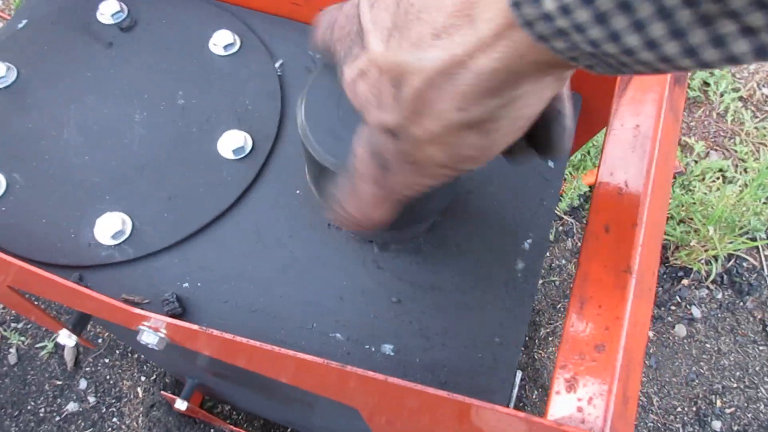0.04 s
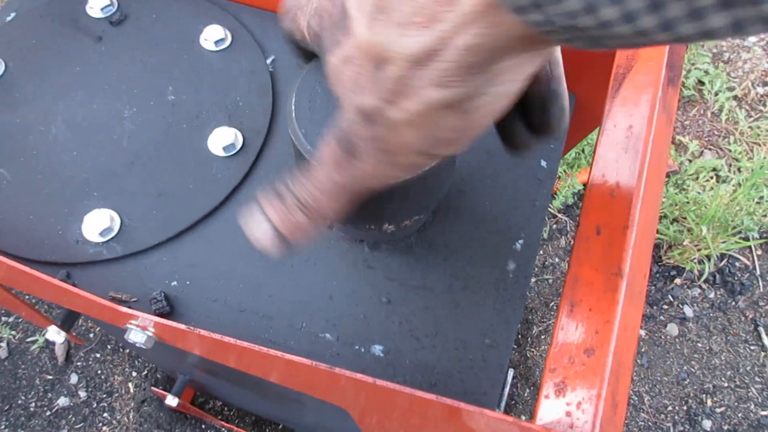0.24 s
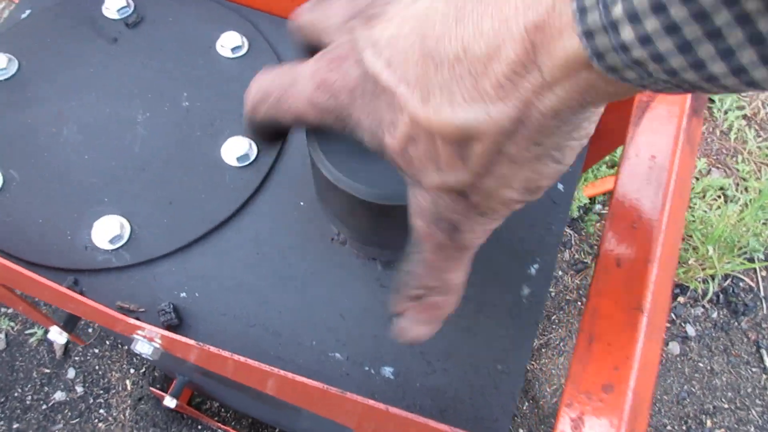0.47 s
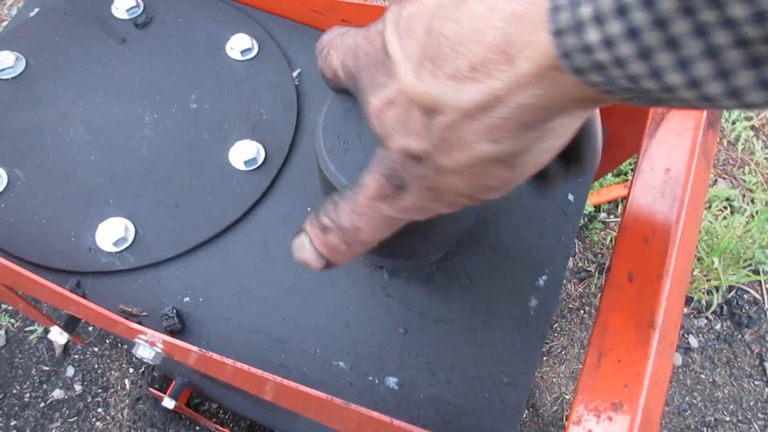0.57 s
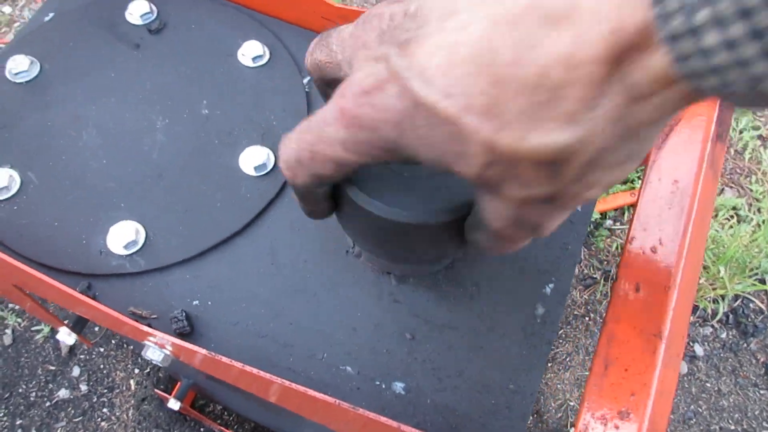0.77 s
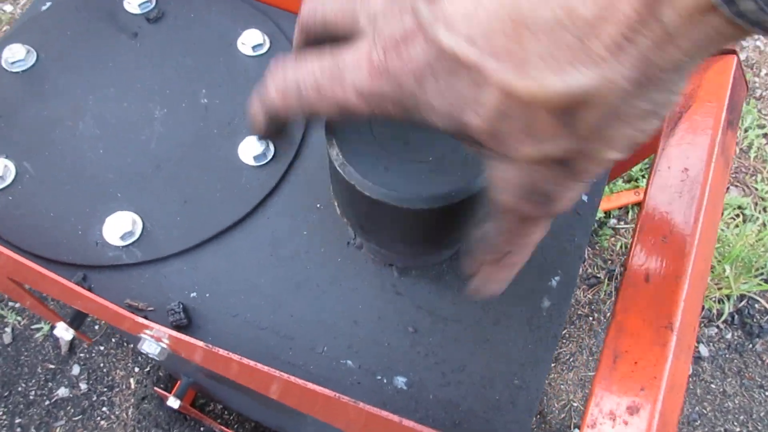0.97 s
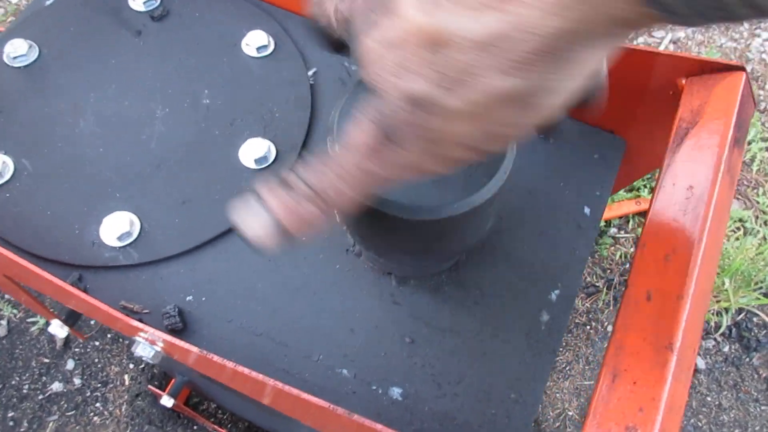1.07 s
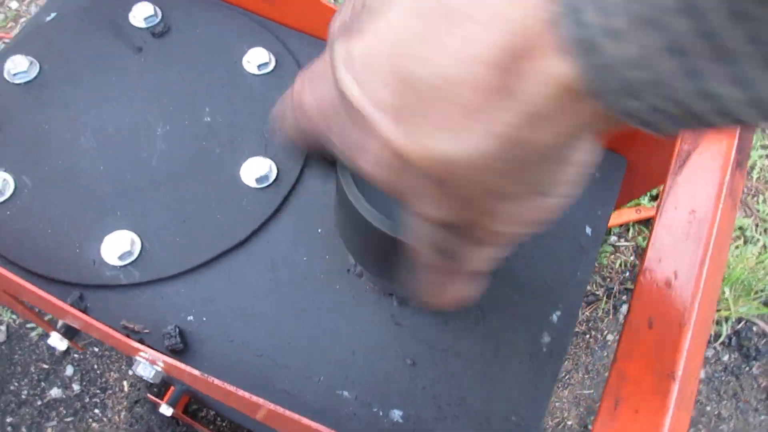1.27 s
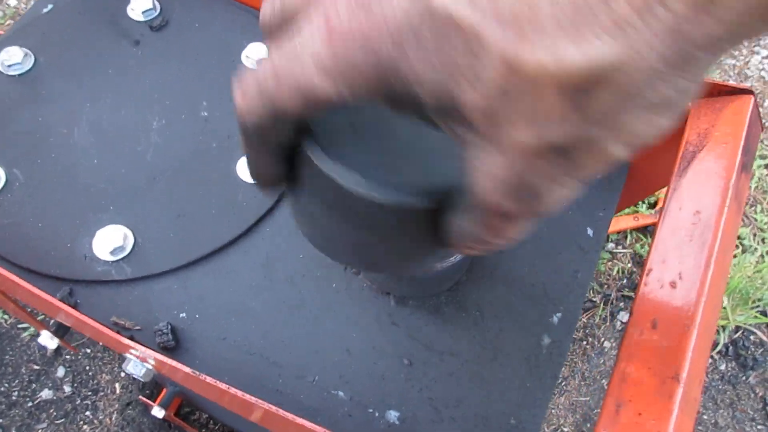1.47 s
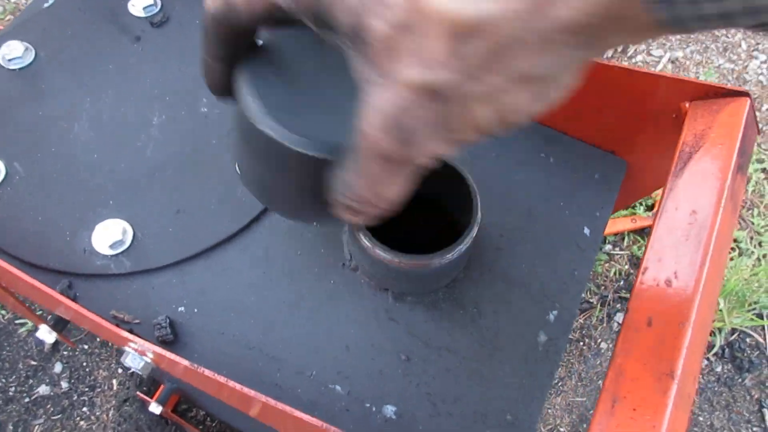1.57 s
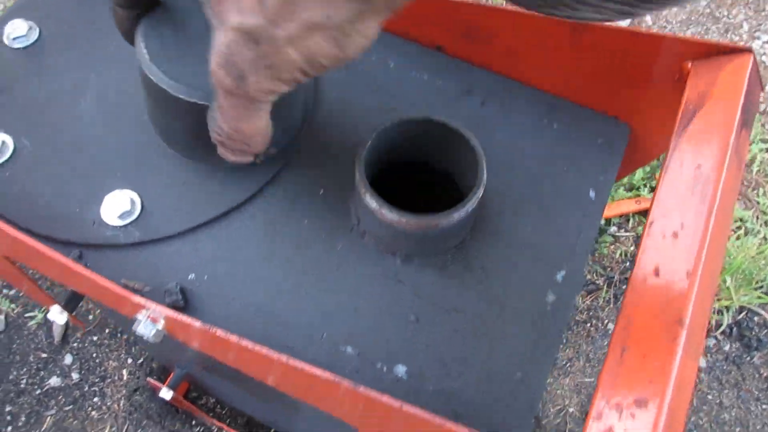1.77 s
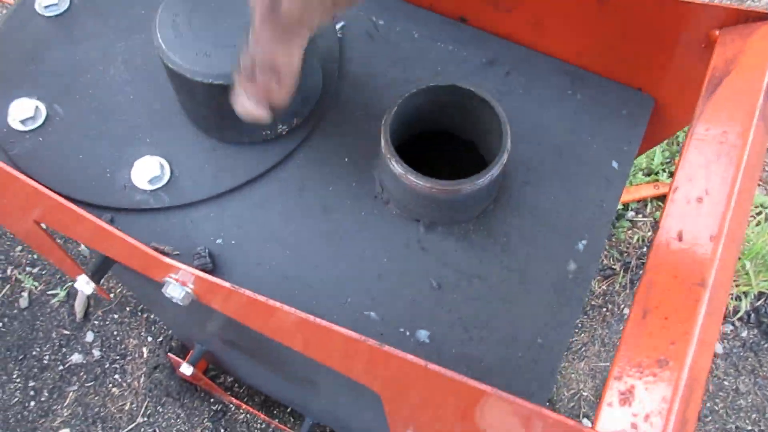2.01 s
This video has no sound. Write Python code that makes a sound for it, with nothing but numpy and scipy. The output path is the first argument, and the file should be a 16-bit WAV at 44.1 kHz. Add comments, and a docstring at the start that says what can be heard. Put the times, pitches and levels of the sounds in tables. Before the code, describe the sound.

A steel cap is worked off a pipe on a hopper, heard close and dry outdoors. A brief palm hiss starts it, then gritty thread scrapes with juddering, clacking twists at about 0.1, 0.4, 0.8-1.0 and a sharp one at 1.3 seconds. Quick hollow knocks and rim scraping follow at 1.6-1.7, then a solid, faintly ringing clunk and slide on the lid at 1.9. Faint air and distant hum underneath.

```python
"""Faint outdoor air and a far machine hum run throughout; a palm brushes the steel, loudest at the start.
A steel cap is twisted off a threaded pipe on a steel hopper, close by. In four short twists the dry
threads grind (clumps of tiny slips), judder (wavering tones with overtones) and click (small blows).
The loose cap knocks on the open pipe's mouth, then is put down on the hopper lid, ringing faintly.
Blows are a push, noise bursts and fading modes; air and palm are filtered noise, the hum is sines."""
import sys
import numpy as np
from scipy import signal
from scipy.fft import rfft, irfft
from scipy.io import wavfile
from scipy.ndimage import map_coordinates

SR = 44100
rng = np.random.default_rng(int(sys.argv[2]) if len(sys.argv) > 2 else 0)


def master_out(mix):
    """Clip the mix to full scale and print it as 16-bit PCM to the path in sys.argv[1]."""
    frames = np.transpose(np.atleast_2d(mix))
    ceiling = np.clip(frames, -1, 1)
    pcm = np.round(ceiling * 32767).astype(np.int16)
    wavfile.write(sys.argv[1], SR, pcm)


N = 90140
T = np.arange(N) / SR


def amp(db):
    """Decibels to gain."""
    return 10 ** (np.asarray(db) / 20)


def unit(x):
    """Scale x to rms 1."""
    return x / np.sqrt(np.mean(x ** 2) + 1e-20)


def wobble(rate):
    """A smooth random curve with rate random points a second."""
    return map_coordinates(rng.standard_normal(N // 8), [T * rate], mode="wrap")


def curve(t, level):
    """Straight lines between the points of a table, along the whole scene."""
    return np.interp(T, t, level)


def add(track, s, x):
    """Mix x into the track from time s on."""
    part = track[max(round(s * SR), 0):][:len(x)]
    part += x[:len(part)]


def through(x, response):
    """Filter x by an impulse response."""
    return signal.fftconvolve(x, response)[:len(x)]


BASS_HZ, TREBLE_HZ = 676, 2070  # where the bass and treble shelves turn


def colour(points, bass_db=0, treble_db=0, size=4096):
    """Impulse response of a spectrum of rms gain 1, then tilted by a bass and a treble shelf."""
    f = np.fft.rfftfreq(size, 1 / SR)
    hz, db = np.transpose(points)
    gain = unit(amp(np.interp(np.log(f + 1), np.log(hz), db)))
    bass = bass_db / (1 + (f / BASS_HZ) ** 4)
    treble = treble_db * (1 - 1 / (1 + (f / TREBLE_HZ) ** 4))
    # folding the cepstrum forward makes the response start at once (minimum phase)
    cepstrum = irfft(np.log(gain * amp(bass + treble) + 1e-6))
    cepstrum[1:size // 2] *= 2
    cepstrum[size // 2 + 1:] = 0
    return irfft(np.exp(rfft(cepstrum)))


RING_WAVER, RING_WAVER_PER_S = 0.36, 70  # phase wander [radians] of a ringing mode, and its pace


def ring(modes):
    """Metal or air ringing: each mode is a fading tone whose phase wavers slightly."""
    t = T[:SR * 3 // 4]
    out = np.zeros(len(t))
    for hz, db, t60 in modes:
        waver = RING_WAVER * np.interp(t * RING_WAVER_PER_S, np.arange(256), rng.standard_normal(256))
        out += amp(db - 60 * t / t60) * np.cos(2 * np.pi * hz * t + waver)
    return out * -np.expm1(-t * 9000)  # a very short fade-in


# A contact: the crack and the sheet steel's ring are noise, the push is a single sample.
CRACK_T60_S, CRACK_DB, SHELL_T60_S, SHELL_DB, PUSH_DB = 0.01, -5, 0.08, -9.5, 14.5


def blow(response, crack_t60, push_db):
    """One contact: a push, a short chattering crack and the dense ring of the sheet steel."""
    t = T[:SR * 3 // 4]
    crack, shell = rng.standard_normal((2, len(t)))
    force = crack * amp(CRACK_DB - 60 * t / crack_t60)
    force += shell * amp(SHELL_DB - 60 * t / SHELL_T60_S)
    force[0] -= amp(push_db)
    return through(force, response)


GRAINS_PER_S, GRAIN_SPREAD_DB, CLUMP_DB = 3000, 2, 3


def friction(strokes, spectrum, modes, ring_db):
    """Rubbing: clumps of tiny random slips under each stroke drive the steel and its modes."""
    slips = (rng.random(N) < GRAINS_PER_S / SR) * rng.choice([-1, 1], N)
    slips = slips * amp(GRAIN_SPREAD_DB * rng.standard_normal(N))
    slips = unit(slips * amp(CLUMP_DB * wobble(260)))
    low = signal.sosfiltfilt(signal.butter(2, TREBLE_HZ, fs=SR, output="sos"), slips)
    high = slips - low
    force = np.zeros(N)
    for stroke in strokes:
        s, db, treble_db = np.transpose(stroke)
        level = amp(np.interp(T, s, db, left=-120, right=-120))  # all but silent outside the stroke
        force += level * (low + amp(curve(s, treble_db)) * high)
    tone = ring(modes)
    tone = tone / np.linalg.norm(tone)
    return through(force, colour(spectrum)) + amp(ring_db) * through(force, tone)


# The many weak upper modes of the cap: where they lie and how long they last
FINE_LOW_HZ, FINE_TOP_HZ, FINE_T60_S = 3330, 14880, 0.043
SEATED_FINE_DB, LOOSE_FINE_DB = -16, -9  # their strength with the cap seated, and loose
RADIATE_HZ = 268  # the steel radiates little below this


def steel(x, fine_db, count=70):
    """The cap's upper modes ring along with every contact; the deep bass does not radiate."""
    t = T[:SR // 3]
    place, size = rng.random((count, 2)).T
    hz = FINE_LOW_HZ + (FINE_TOP_HZ - FINE_LOW_HZ) * (np.arange(count) + place) / count
    tones = (size - .5)[:, None] * np.sin(2 * np.pi * hz[:, None] * t)
    fine = tones.sum(0) * amp(-60 * t / FINE_T60_S)
    upper = through(x, fine / np.linalg.norm(fine))
    high_pass = signal.butter(3, RADIATE_HZ, "high", fs=SR, output="sos")
    return signal.sosfilt(high_pass, x + amp(fine_db) * upper)


# Colour of the outdoor air: f/Hz, level/dB
AIR_COLOUR = [(20, -26), (65, -4), (120, -10), (200, -10), (290, -2.5), (420, -22), (620, -17.5),
              (1000, -20), (2000, -22.5), (7000, -44), (15000, -44.5)]
AIR_DB = -51.5


def outdoor_air():
    """Outdoor air is steady noise, filtered to its colour."""
    return amp(AIR_DB) * through(rng.standard_normal(N), colour(AIR_COLOUR))


# Tones of the distant machine, before their swell: f/Hz, level/dB
HUM_TONES = [(53.3, -64), (70.7, -56.5), (99.5, -65.5), (289, -70.5), (568, -62)]
# Swell of all these tones together: t/s, level/dB
HUM_SWELL_CURVE = [(0, 2.5), (.36, 11), (.46, -1.5), (1.22, 5.5), (1.4, -2.5), (2.04, -1)]


def distant_machine():
    """A far hum: a few sines, slightly unsteady in level and phase, swelling together."""
    swell_db = curve(*np.transpose(HUM_SWELL_CURVE))
    hum = np.zeros(N)
    for hz, db in HUM_TONES:
        level = amp(db + swell_db + 0.5 * wobble(15)) * np.sqrt(2)  # the table gives rms levels
        hum += level * np.sin(2 * np.pi * hz * T + 0.13 * wobble(14))
    return hum


# Loudness of the palm sliding on the cap: t/s, level/dB
PALM_LEVEL = [(0, -45.5), (.04, -42.5), (.1, -52), (.3, -69), (.345, -60.5), (.66, -67), (1.0, -55.5),
              (1.06, -77), (1.19, -61), (1.5, -89), (1.55, -70.5), (2.04, -73)]
# Colour of skin on steel: f/Hz, level/dB
SKIN_COLOUR = [(300, -2), (2000, -7), (2900, -15.5), (4100, 2), (5000, -13.5), (7000, -6.5), (8400, -5.5),
               (9500, -10.5), (11300, -18), (13500, -12.5), (15500, -28)]


def palm():
    """Dry skin hisses over the steel as the grip shifts: noise that follows a level curve."""
    level_db = curve(*np.transpose(PALM_LEVEL)) + 0.66 * wobble(31)
    return amp(level_db) * through(rng.standard_normal(N), colour(SKIN_COLOUR))


# Modes of the free cap, some in close pairs that beat: f/Hz, level/dB, t60/s
CAP_MODES = [(569, -29, .4), (1125, -32, .22), (2503, -38, .55), (2541, -44, .5), (3348, -32, .17),
             (3397, -30, .1), (3650, -28, .11), (4480, -29, .1), (5093, -30, .1), (5873, -48, .36),
             (5975, -33, .15)]
# The cap landing on the hopper lid and rocking: t/s, level/dB, bass/dB, treble/dB
LANDING_BLOWS = [(1.8812, 0, 0.5, -3), (1.8815, -4, -4.5, -10), (1.8944, -13, 9.5, -8),
                 (1.9075, -27, -5, 15), (1.9147, -19.5, 13, 18), (1.9295, -21.5, -20, 10.5)]
# The cap's rim sliding on the lid: t/s, level/dB, treble/dB
LID_SLIDE = [(1.881, -30, 4), (1.89, -24.5, 1), (1.906, -29.5, 9.5), (1.918, -16.5, 6), (1.934, -24.5, -4),
             (1.952, -37, 11), (1.98, -50, 2), (2.03, -58.5, 0), (2.043, -36, -14)]
# Colour of the lid under the cap: f/Hz, level/dB
LID_COLOUR = [(60, -8), (230, -15), (350, -12.5), (470, 1), (700, 2.5), (1000, 0.5), (1350, 1), (1600, -9),
              (2400, -9), (3700, -24.5), (4500, -28), (6000, -29.5), (8500, -34), (10500, -35.5),
              (13000, -49), (15000, -62)]
SLIDE_RING_DB, LANDING_RING_DB = -17.5, -15


def landing():
    """The cap is put down on the lid, rocks and slides a little, ringing as it does."""
    out = friction([LID_SLIDE], LID_COLOUR, CAP_MODES, SLIDE_RING_DB)
    for s, db, bass_db, treble_db in LANDING_BLOWS:
        contact = blow(colour(LID_COLOUR, bass_db, treble_db), CRACK_T60_S, PUSH_DB)
        add(out, s, amp(db) * (contact + amp(LANDING_RING_DB) * ring(CAP_MODES)))
    return out


# The freed cap hitting the pipe's mouth: t/s, level/dB, bass/dB, treble/dB, pipe ring level/dB
MOUTH_BLOWS = [(1.6142, -12.5, -13, 1, -10.5), (1.6415, -14, 8.5, -14, -12), (1.6715, -10.5, -1, -3, -10.5),
               (1.6858, -14, -6, 5.5, -9)]
# The cap's rim dragging over the last thread: t/s, level/dB, treble/dB
RIM_DRAG = [(1.614, -19.5, 2.5), (1.638, -45, 12), (1.648, -29.5, 12), (1.667, -40, 0), (1.678, -27, 11.5),
            (1.703, -29, 11.5), (1.72, -29.5, 4), (1.745, -45, -7), (1.79, -56, -4)]
# Colour of the steel with the cap loose: f/Hz, level/dB
LOOSE_COLOUR = [(60, -41), (220, -23), (340, -14), (470, -5.5), (700, 8), (1000, -3), (1400, -7.5),
                (1900, -8), (2500, -21.5), (2900, -19.5), (3550, -11.5), (4100, -33), (6000, -28.5),
                (7800, -27), (9000, -35.5), (10000, -22.5), (11700, -43), (13000, -32), (15000, -72.5)]
# Modes of the air in the open pipe: f/Hz, level/dB, t60/s
PIPE_MODES = [(455, 2, .105), (622, -10, .1), (750, -17, .15), (838, -7, .11), (1075, -11, .12),
              (1460, -20, .07), (1787, -21, .09)]
DRAG_RING_DB, KNOCK_RING_DB = -0.5, -9.5
HOLLOW_DB, HOLLOW_T60_S = -27.5, 0.84  # the hopper's hollow, heard once the pipe is open


def knocks():
    """The freed cap bumps and drags over the rim, sounding itself, the open pipe and the hollow below."""
    out = friction([RIM_DRAG], LOOSE_COLOUR, PIPE_MODES + CAP_MODES, DRAG_RING_DB)
    for s, db, bass_db, treble_db, ring_db in MOUTH_BLOWS:
        contact = amp(db) * blow(colour(LOOSE_COLOUR, bass_db, treble_db), CRACK_T60_S, PUSH_DB)
        pipe_ring = amp(ring_db) * ring(PIPE_MODES)
        add(out, s, contact + pipe_ring + amp(KNOCK_RING_DB) * ring(CAP_MODES))
    t = T[:SR // 2]
    hollow = rng.standard_normal(len(t)) * amp(-60 * t / HOLLOW_T60_S)  # fading noise as an echo
    return out + amp(HOLLOW_DB) * through(out, hollow / np.linalg.norm(hollow))


# The threads sticking and slipping: t/s, hold/s, t60/s, f/Hz, level/dB, overtone level/dB
THREAD_JUDDERS = [(0.158, 0.0074, 0.026, 925, -10.5, -24), (0.204, 0.008, 0.037, 846, -16.5, -19),
                  (.228, 0.0041, 0.02, 870, -12, -14.5), (0.233, 0.021, 0.17, 947, -16.5, -45),
                  (0.401, 0.0085, 0.054, 904.3, -4, -4), (.503, 0.034, 0.065, 852, -29, -25),
                  (.529, 0.0031, 0.054, 1003, -20.5, -35), (0.551, 0.0077, 0.07, 873, -24.5, -29),
                  (0.587, 0.014, 0.028, 915, -35.5, -30), (0.974, 0.0058, 0.022, 1026, -17, -29),
                  (1.276, 0.0088, 0.017, 790, -25, -24)]
# Overtones of a judder: multiple of its pitch, level/dB
JUDDER_OVERTONES = [(2, -9), (3, -11), (4, -7.5), (6, -20.5), (8, -26.5)]
JUDDER_RISE_S, JUDDER_WANDER, JUDDER_ROUGH_DB = 0.0017, .035, 3  # wander is a fraction of the pitch


def judders():
    """The threads stick and slip for a moment at the pitch of the cap's rocking."""
    out, t = np.zeros(N), T[:SR // 4]
    for s, hold, t60, hz, db, overtones_db in THREAD_JUDDERS:
        after_hold = np.maximum(t - hold, 0)
        slipping = amp(-60 * after_hold / 0.06)  # pitch and level steady as this dies away
        pitch = hz * (1 + JUDDER_WANDER * slipping * wobble(282)[:len(t)])
        phase = 2 * np.pi * np.cumsum(pitch) / SR
        rough_db = JUDDER_ROUGH_DB * slipping * wobble(267)[:len(t)]
        shape = np.minimum(t / JUDDER_RISE_S, 1) * amp(rough_db - 60 * after_hold / t60)
        overtones = sum(amp(level) * np.sin(round(k) * phase) for k, level in JUDDER_OVERTONES)
        add(out, s, amp(db) * shape * (np.sin(phase) + amp(overtones_db) * overtones))
    return out


# The cap rocking in its threads: t/s, level/dB, bass/dB, treble/dB
THREAD_CLICKS = [(0.114, -26, -14, -1), (0.1357, -24, 7, 5.5), (0.16, -13.5, 3.5, -19),
                 (.229, -7, -22, -11), (0.3731, -35, 16.5, -20), (0.4023, -22, -18, 9),
                 (0.4063, -13, -7, 8), (0.395, -24.5, -12, -16), (0.4203, -8.5, -15, 5.5),
                 (.491, -22, -18, -7), (0.5312, -19.5, -12, -11), (0.5484, -26.5, -20, -3.5),
                 (0.7761, -11, -10, -4.5), (0.8221, -9.5, -5, 7.5), (0.8375, -15.5, 8, 6),
                 (0.9197, -28, 13, -4), (0.945, -8.5, 6.5, -2.5), (0.9553, -15, 1.5, -9),
                 (0.9729, -14, -1, -3.5), (.9915, -24, 1, -11), (1.291, -4, 0, 7),
                 (1.2926, -7.5, 3.5, 10.5)]
# Colour of the steel with the cap seated: f/Hz, level/dB
SEATED_COLOUR = [(60, -32), (200, -13.5), (330, -11.5), (450, -5), (620, -0.5), (760, -4), (880, -6.5),
                 (1070, -2), (1230, -13.5), (1500, 1), (2050, -11.5), (2500, -8.5), (2850, -12), (3600, -6),
                 (4100, -20.5), (5000, -25), (6500, -37), (7500, -24), (9000, -39), (11800, -44.5),
                 (13500, -49.5), (15500, -56)]
# Modes of the hopper top with the cap on: f/Hz, level/dB, t60/s
HOPPER_MODES = [(571, -22, .35), (625, -8, 0.04), (853, -14, .16), (900, -14, 0.067), (1078, -13, 0.09),
                (1470, -18, 0.2), (2336, -18, 0.12), (2500, -30, 0.3), (3130, -13, 0.06), (3661, -14, 0.08),
                (5990, -36, .12)]
CHATTER_T60_S, CLICK_PUSH_DB, CLICK_RING_DB = 0.018, 12.5, -9


def clicks():
    """The cap tips in its loose threads and strikes the pipe, making the hopper top ring."""
    out = np.zeros(N)
    for s, db, bass_db, treble_db in THREAD_CLICKS:
        contact = blow(colour(SEATED_COLOUR, bass_db, treble_db), CHATTER_T60_S, CLICK_PUSH_DB)
        add(out, s, amp(db) * (contact + amp(CLICK_RING_DB) * ring(HOPPER_MODES)))
    return out


# The threads grinding, as a list of rubs: t/s, level/dB, treble/dB
GRIND_STROKES = [
    [(.1, -41, 6), (.115, -31, -3.5), (.145, -24, 2), (.175, -23, -3), (.2, -27, -6), (.23, -21.5, -13),
     (.256, -29.5, -21), (.275, -37.5, -11), (.34, -53, -17)],
    [(.365, -47.5, -33), (.395, -32, -6.5), (.425, -35.5, 13), (.458, -41.5, 7.5), (.478, -32.5, 6.5),
     (.5, -35, 2), (.55, -32.5, -4.5), (.575, -37.5, -18), (.64, -65, -19.5)],
    [(.685, -56, -15), (.712, -41.5, 1.5), (.76, -38.5, 7), (.782, -20, -3), (.805, -29, 1.5),
     (.848, -27.5, -4.5), (.872, -35.5, -6), (.912, -46, -9)],
    [(.914, -39, -8), (.942, -32, -11), (.955, -30.5, 6), (.98, -24, -10.5), (1.0, -35.5, -12.5),
     (1.025, -44.5, -12), (1.1, -61, -4)],
    [(1.26, -55, -8), (1.28, -19, -10.5), (1.308, -33.5, 8.5), (1.335, -30.5, 3.5), (1.37, -33, 0),
     (1.398, -43.5, -11), (1.45, -65, -2)],
]
# Colour of the dry threads grinding: f/Hz, level/dB
GRIND_COLOUR = [(100, -14.5), (430, -12), (620, -1), (760, -5), (880, 1), (1070, 0), (1230, -6), (1500, -3),
                (2050, -17), (2500, -19), (2850, -13), (3600, -22), (4100, -22.5), (5000, -28.5),
                (6500, -32), (7500, -23), (9000, -36.5), (11900, -47.5), (13100, -31.5), (14000, -45.5),
                (15500, -54)]
GRIND_RING_DB = -6.5


def grinding():
    """Dry threads rub past each other in tiny slips and make the hopper top ring."""
    return friction(GRIND_STROKES, GRIND_COLOUR, HOPPER_MODES, GRIND_RING_DB)


def scene():
    """The air and the hum, with unscrewing, lifting off and putting down."""
    background = outdoor_air() + distant_machine()
    loose_cap = steel(knocks() + landing(), LOOSE_FINE_DB)
    unscrewing = steel(grinding() + clicks(), SEATED_FINE_DB) + judders() + palm()
    return (background + loose_cap + unscrewing)[None]


TOP_HZ = 15400


def record(dry):
    """Peaks beyond full scale are cut flat, then a low-pass takes away what lies above its limit."""
    clipped = np.clip(dry, -1, 1)
    low_pass = signal.firwin(129, TOP_HZ, fs=SR)
    return signal.fftconvolve(clipped, low_pass[None], mode="same", axes=1)


dry = scene()
out = record(dry)
master_out(out)
```